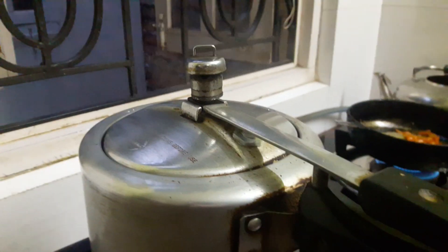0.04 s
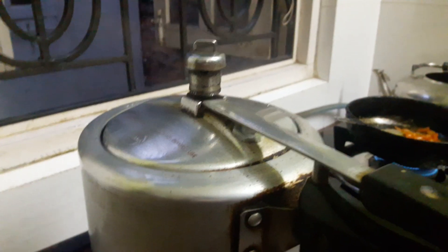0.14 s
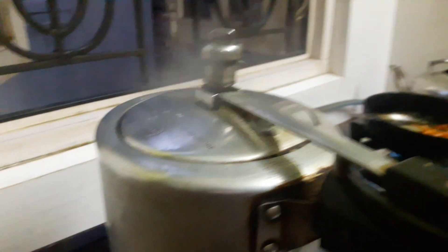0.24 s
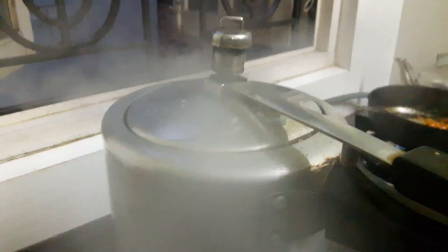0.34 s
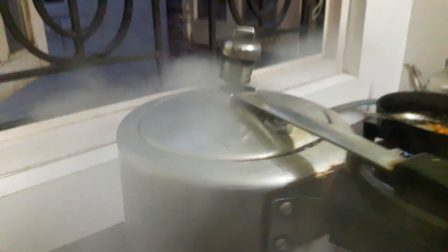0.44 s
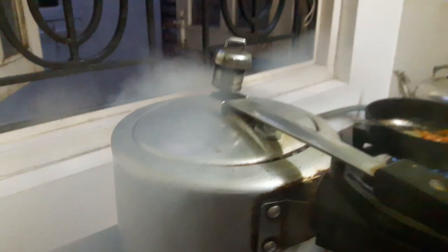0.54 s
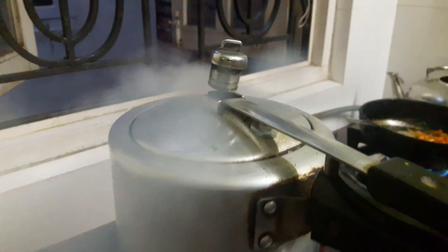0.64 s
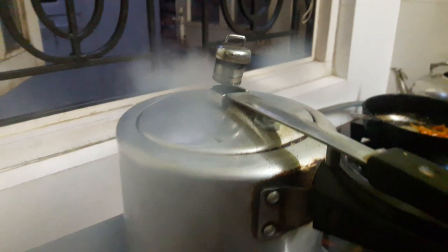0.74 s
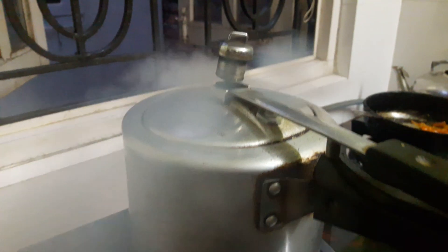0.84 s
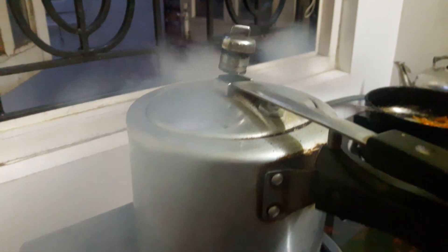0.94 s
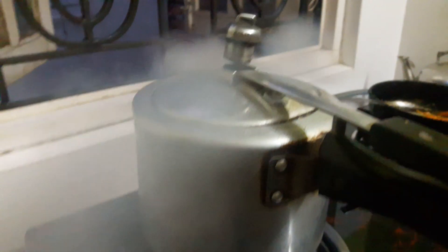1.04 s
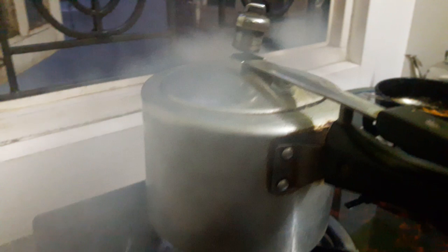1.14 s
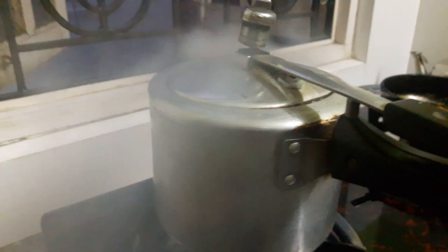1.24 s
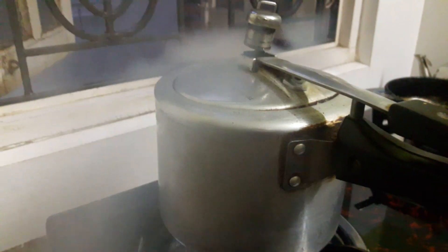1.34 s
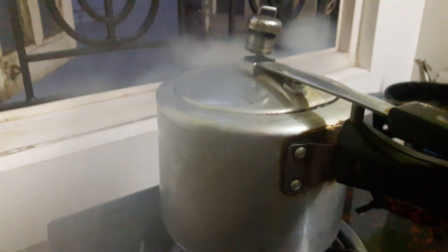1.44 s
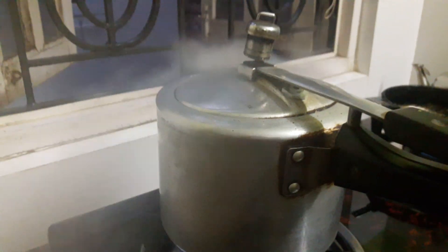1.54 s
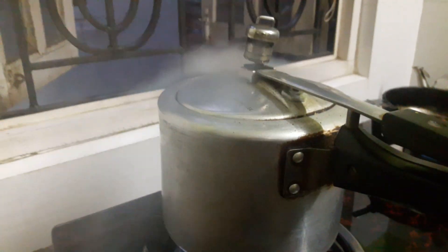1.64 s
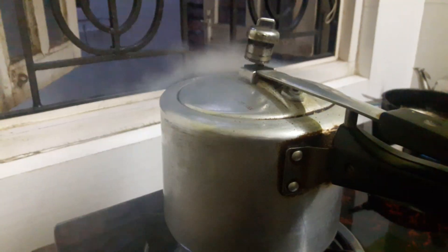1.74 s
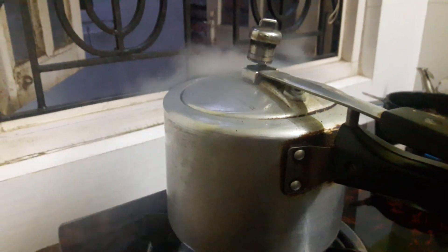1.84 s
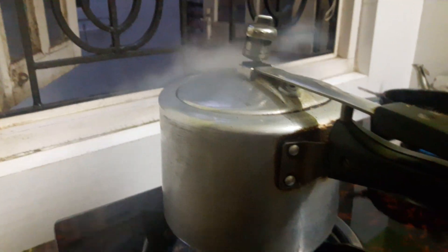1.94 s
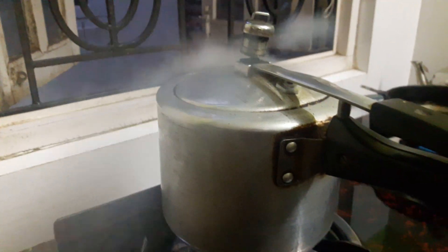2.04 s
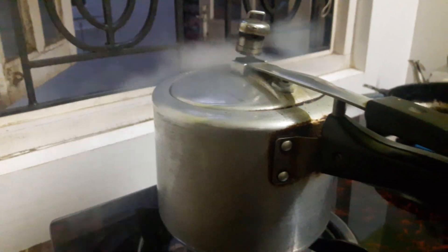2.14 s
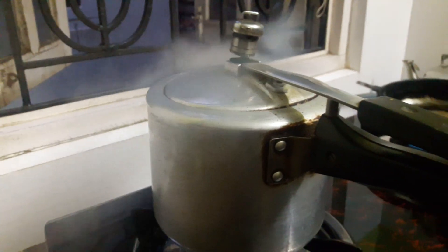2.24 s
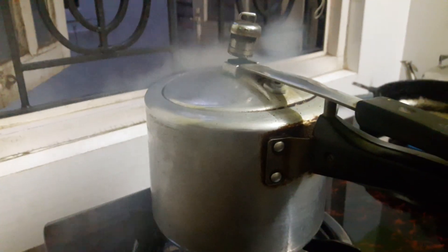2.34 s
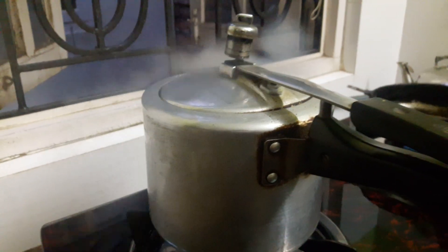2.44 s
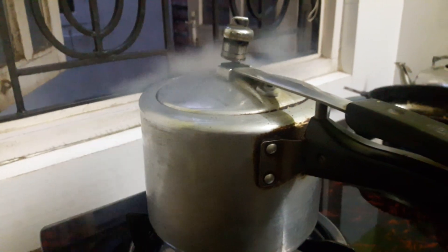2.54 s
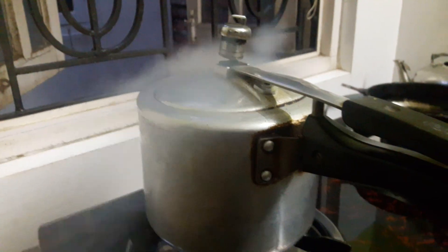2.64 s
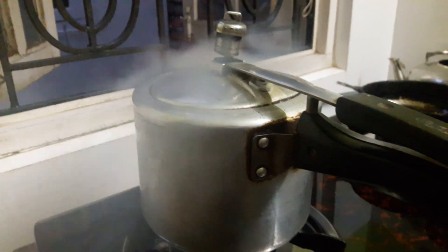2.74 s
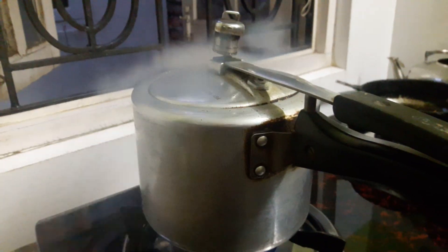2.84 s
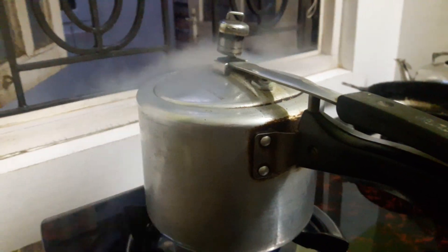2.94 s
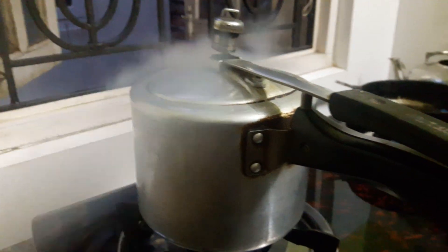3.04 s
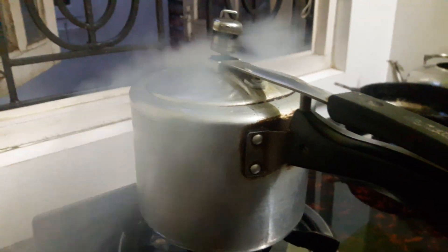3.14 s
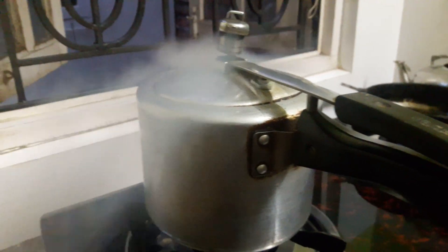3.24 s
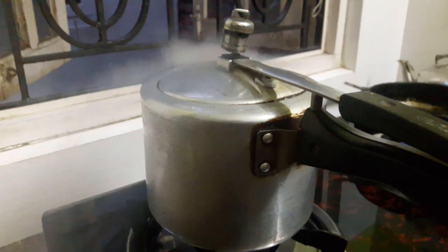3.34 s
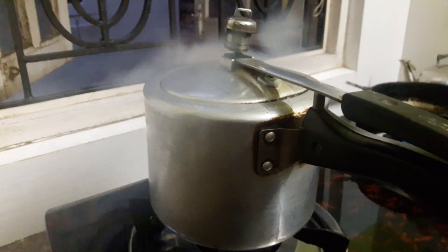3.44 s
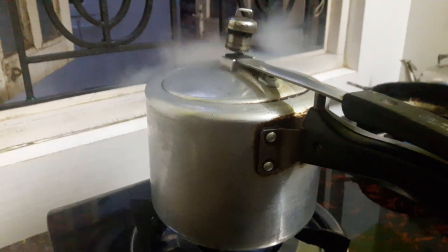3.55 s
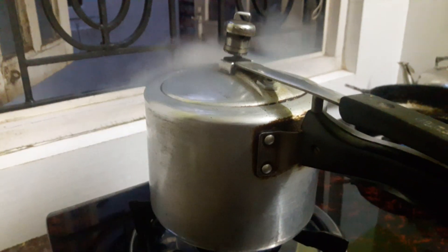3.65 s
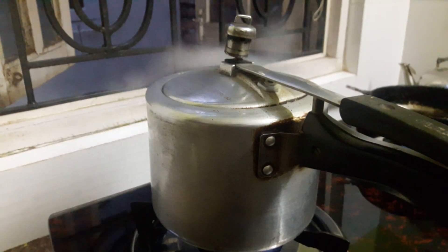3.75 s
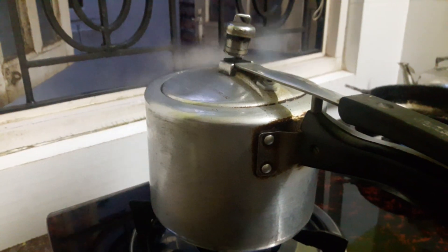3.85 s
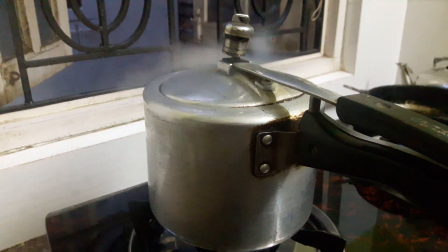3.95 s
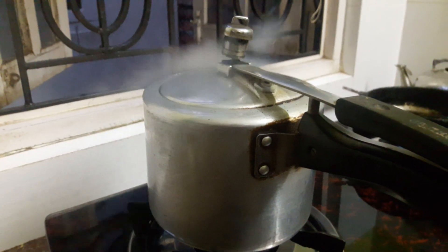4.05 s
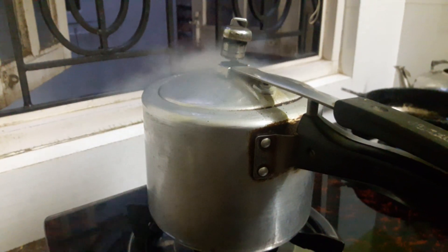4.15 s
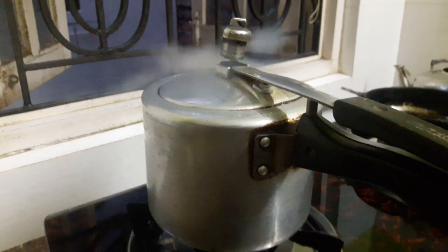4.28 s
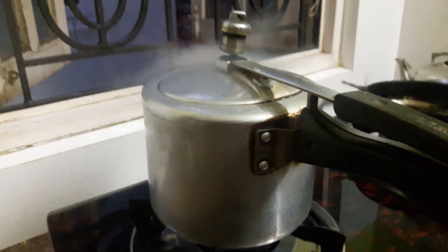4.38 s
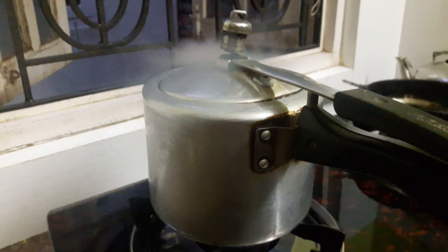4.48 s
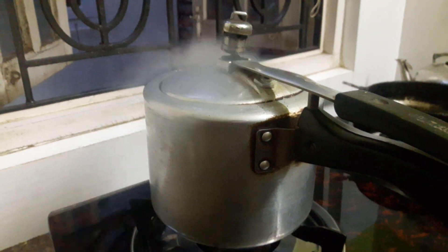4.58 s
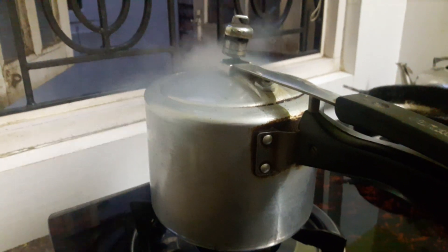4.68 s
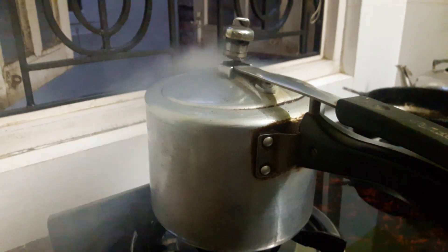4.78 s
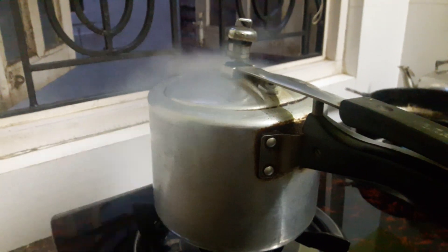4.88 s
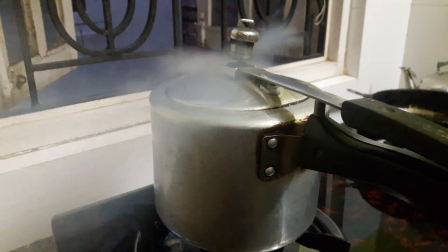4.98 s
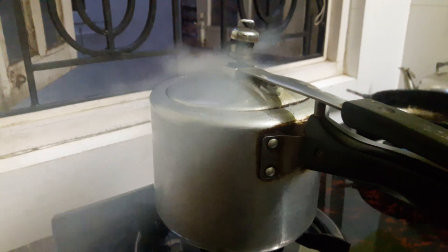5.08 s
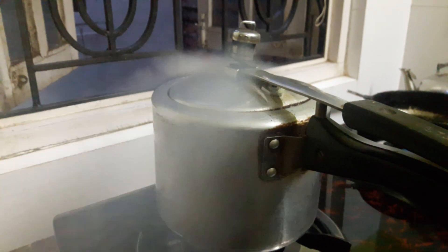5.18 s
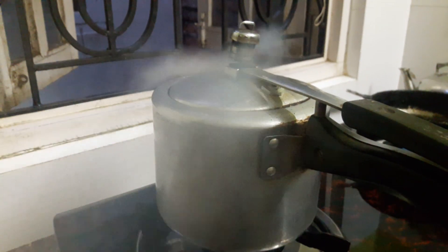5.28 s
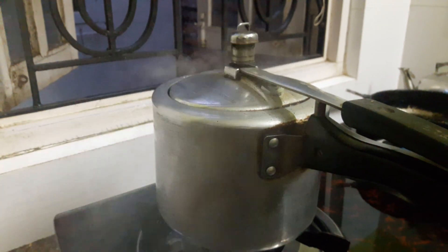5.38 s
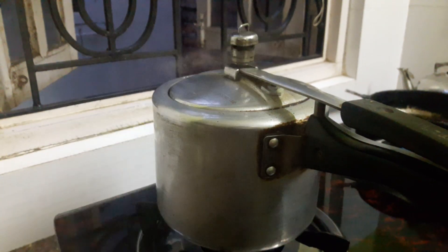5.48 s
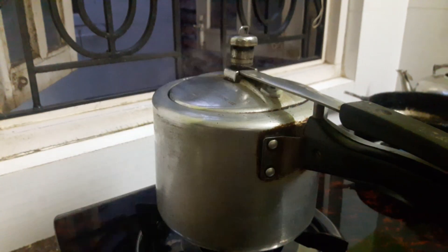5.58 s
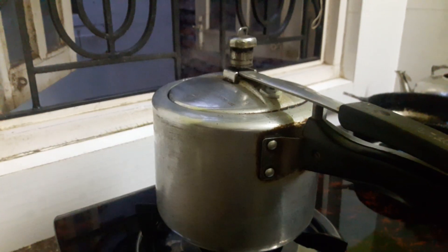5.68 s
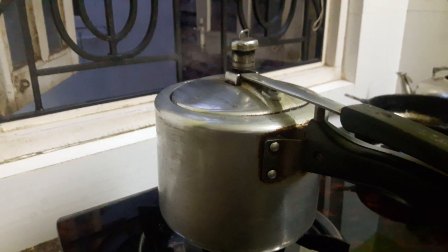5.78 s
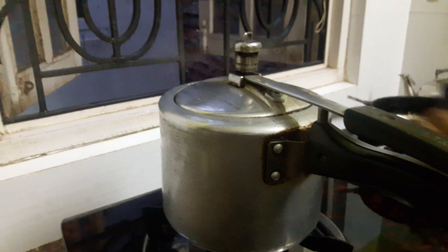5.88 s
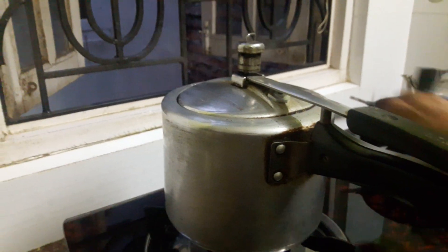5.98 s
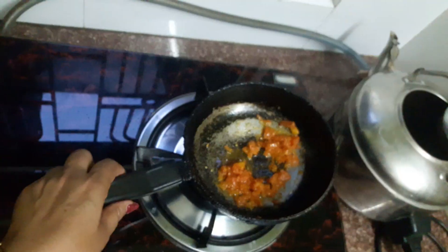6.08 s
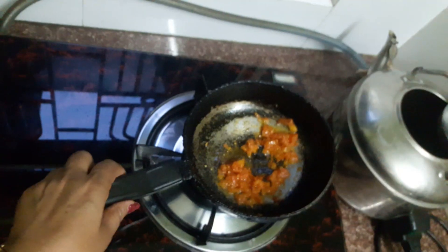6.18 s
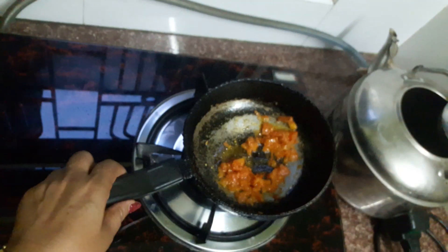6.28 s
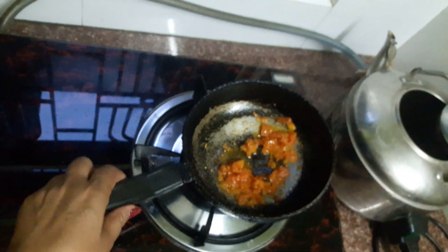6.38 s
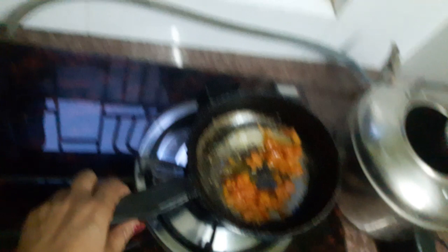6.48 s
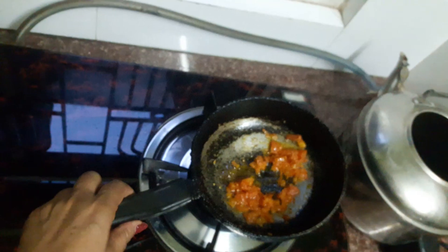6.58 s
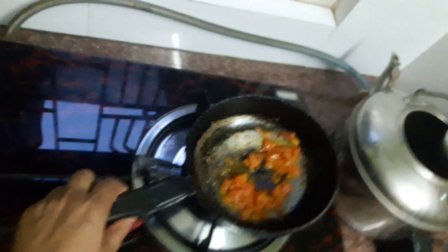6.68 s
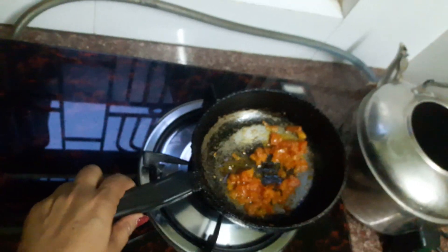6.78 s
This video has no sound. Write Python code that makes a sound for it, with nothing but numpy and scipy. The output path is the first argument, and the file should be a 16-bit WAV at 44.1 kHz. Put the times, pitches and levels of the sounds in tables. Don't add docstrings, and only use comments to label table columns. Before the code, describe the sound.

Close microphone, small hard kitchen, nearly mono. A weak uneven steam leak over flame rumble swells in under half a second into a loud, steady rush of steam with crackling distortion and an airy high whistle. After about five seconds it snaps shut, decaying quickly into near silence. Then, abruptly, a frying pan is close by, sizzling delicately with bubbles, fat spits and a few low knocks.

```python
import sys
import numpy as np
from scipy import signal
from scipy.fft import rfft, irfft
from scipy.io import wavfile
from scipy.ndimage import uniform_filter1d

SR = 44100
rng = np.random.default_rng(int(sys.argv[2]) if len(sys.argv) > 2 else 0)


def unload_audio(sound):
    columns = np.transpose(np.atleast_2d(sound))
    steps = np.round(np.clip(columns, -1, 1) * 32767)
    wavfile.write(sys.argv[1], SR, steps.astype(np.int16))


def amplitude_ratio(level_db):
    exponent = np.asarray(level_db, float) / 20
    return 10 ** exponent


N = 300762
LIFT_S, SHUT_S, PAN_S = .42, 5.455, 6.0836
GUSTS_PER_S = 7.0


def read(points, hz):
    f, value = np.transpose(points)
    return np.interp(np.log(hz + 1), np.log(f + 1), value)


def evened(x):
    return x / np.sqrt(np.mean(x ** 2) + 1e-20)


def add(mix, s, sound):
    part = mix[round(s * SR):][:len(sound)]
    part += sound[:len(part)]


def ramp(t, start, length):
    return np.clip((t - start) / length, 0, 1)


def bell(hz, centre, width):
    return np.exp(-((hz - centre) / width) ** 2)


def bumps(modes, hz):
    return sum(db * bell(hz, f, width) for f, width, db in modes)


def band_db(shape_db, hz, lo, hi):
    in_band = (hz > lo) & (hz < hi)
    return 10 * np.log10((amplitude_ratio(shape_db) ** 2 * in_band).mean(0))


def band_noise(size, lo_hz, hi_hz, skirt_hz):
    hz = np.fft.rfftfreq(size, 1 / SR)
    outside = np.maximum(np.maximum(lo_hz - hz, hz - hi_hz), 0)
    return evened(irfft(rfft(rng.standard_normal(size)) * np.exp(-(outside / skirt_hz) ** 2)))


def gusts(t, per_s):
    f = np.geomspace(per_s / 5, per_s, num=24)[:, None]
    waves = np.sin(2 * np.pi * (f * t + rng.random(f.shape))) / np.sqrt(f)
    return evened(waves.sum(0))


def ring(hz, t60, soft):
    t = np.arange(round(t60 * SR)) / SR
    return np.cos(2 * np.pi * hz * t) * amplitude_ratio(-60 * t / t60) * (1 - np.exp(-t / soft))


def grid(size):
    return np.fft.rfftfreq(size, 1 / SR)[:, None], np.arange(4 * N // size + 5) * size / 4 / SR


def hiss(shape_db, level_db, hz, lo, hi, patchy_db, flicker_db, ripple_db):
    a, b, patches, ripple = rng.standard_normal(shape_db.shape[::-1] + (4,)).T
    ripple = uniform_filter1d(ripple, size=250, axis=1)
    ripple = evened(uniform_filter1d(ripple, size=150, axis=1))
    patches = uniform_filter1d(patches, size=7, axis=0)
    patches = evened(uniform_filter1d(patches, size=16, axis=1))
    flicker = evened(uniform_filter1d(rng.standard_normal(a.shape[1]), size=4))
    gain_db = shape_db - band_db(shape_db, hz, lo, hi) + level_db
    gain_db = gain_db + patchy_db * patches + ripple_db * ripple + flicker_db * flicker
    noise = a + 1j * b
    size = 2 * len(hz) - 2
    both = np.array([noise, noise * amplitude_ratio(gain_db)])
    white, out = signal.istft(both, nperseg=size, noverlap=3 * size // 4)[1]
    return out[:N] / white.std()


# (frequency [Hz], density [dB per Hz])
FLAME_COLOUR = [(18, -50), (30, -28), (60, -9), (112, 2), (145, -3), (180, -20), (269, -13), (420, -19),
                (600, -21), (1300, -30)]
# (frequency [Hz], density [dB per Hz])
ROOM_COLOUR = [(18, -43), (30, -11.5), (59, -1), (117, 0), (362, -5), (596, -11), (1090, -9), (1270, -13),
               (4040, -12), (5390, -16), (7200, -6), (8200, -10.5), (15800, -11.5)]
# (time [s], frequency [Hz], level [dB], t60 [s])
LID_RINGS = [
    (5.452, 535, -64, .5),
    (5.47, 290, -77, .6),
    (5.655, 14200, -82, .12),
    (6.455, 535, -74, .4),
    (6.1, 280, -73, .3),
    (6.23, 270, -74, .3),
]


def kitchen():
    hz, t = grid(size=1024)
    flame_heard = (t > PAN_S) | (t < LIFT_S)
    shape_db = np.where(flame_heard, read(FLAME_COLOUR, hz), read(ROOM_COLOUR, hz))
    now = np.arange(N) / SR
    ducked_db = -93.5 + 5 * np.exp(-np.maximum(now - SHUT_S, 0) / .25)
    level_db = np.maximum(-71 - 72 * np.maximum(now - .18, 0), ducked_db)
    level_db = np.where(now > PAN_S, -75.5 + 12 * (now - PAN_S), level_db)
    out = hiss(shape_db, 0, hz, lo=50., hi=400., patchy_db=.8, flicker_db=.8, ripple_db=.6)
    out = amplitude_ratio(level_db) * out
    for at, ring_hz, db, t60 in LID_RINGS:
        add(out, at, amplitude_ratio(db) * ring(ring_hz, t60, soft=0.0072))
    return out


# (frequency [Hz], density [dB per Hz])
PAN_COLOUR = [(240, -45), (400, -5), (890, -18), (1070, -8), (1310, -16), (1600, -14), (2820, -11.5),
              (3960, -10.5), (4410, -20), (5640, -2.5), (8670, -4.5), (12900, -22.5), (15800, -14.5)]
# (frequency [Hz], width [Hz], level [dB])
PAN_MODES = [(3800, 150, 2.5), (4600, 200, 14.5), (5960, 400, -1), (3200, 400, -3)]
# (time [s], peak [dB], frequency [Hz])
SPITS = [(6.0838, -44, 7400), (6.0895, -48, 4500), (6.1274, -43, 10000), (6.1416, -42, 7200),
         (6.1506, -44, 5000), (6.2028, -46, 5700), (6.2186, -42, 4600), (6.2244, -44, 5900),
         (6.229, -47, 8600), (6.2448, -45, 14000), (6.258, -47, 5800), (6.339, -46, 6500),
         (6.3694, -45, 7000), (6.3994, -48, 14000), (6.4966, -42, 9100), (6.547, -45, 6000),
         (6.586, -47, 12000), (6.6228, -49, 4600), (6.6338, -46, 7500), (6.6455, -51, 5000),
         (6.6657, -46, 6900), (6.6808, -48, 4800), (6.689, -49, 4800), (6.7855, -47, 5200)]
# (time [s], signed peak [full scale], frequency [Hz], t60 [s])
KNOCKS = [
    (6.5628, .004, 900, .006),
    (6.5646, .007, 2200, .004),
    (6.5655, -.0045, 160, .03),
    (6.5858, .009, 1300, .003),
    (6.5853, -.039, 365, .017),
    (6.6837, .009, 335, .02),
    (6.6855, -.0032, 105, .05),
    (6.7525, .002, 280, .015),
    (6.758, -.0026, 380, .015),
    (.31, .002, 80, .046),
]


def pan():
    hz, t = grid(size=256)
    level_db = -58.6 - 1.0 * np.maximum(t - PAN_S, 0)
    fizz_db = 1.5 + 33 * np.maximum(t - 6.47, 0)
    shape_db = read(PAN_COLOUR, hz) + bumps(PAN_MODES, hz) + fizz_db * read([(8500, 0), (12500, 1)], hz)
    out = hiss(shape_db, level_db, hz, lo=4000., hi=10000., patchy_db=1.3, flicker_db=1.0, ripple_db=1.2)
    for pop_hz in np.geomspace(4200, 15000, num=12):
        sizes = amplitude_ratio(3.2 * np.minimum(rng.exponential(size=N), 4))
        pops = sizes * (rng.random(N) < 25 / SR)
        out += amplitude_ratio(-66.5) * signal.oaconvolve(pops, ring(pop_hz, .004, soft=.0001))[:N]
    for at, db, spit_hz in SPITS:
        fade = amplitude_ratio(-60 * np.arange(3000) / SR * spit_hz / 150)
        spray = band_noise(3000, .85 * spit_hz, 1.15 * spit_hz, skirt_hz=600)
        add(out, at, amplitude_ratio(db - 9.5) * fade * spray)
        add(out, at, amplitude_ratio(db + 3.5) * ring(spit_hz, 0.0027, soft=.00003))
    out = signal.sosfilt(signal.butter(4, 250, "high", fs=SR, output="sos"), out)
    out[:round(PAN_S * SR)] = 0
    for at, peak, knock_hz, t60 in KNOCKS:
        add(out, at, peak * ring(knock_hz, t60, soft=0.000068))
    return out


# (time [s], level [dB])
LULLS = [(1.4, 2.5), (1.85, 1), (2.2, -3.5), (2.58, -4.5), (2.79, 0.5), (2.9, -0.5), (3.3, 1), (3.47, 2),
         (3.68, -4), (3.98, 0.5), (4.28, -1.5), (4.68, -1.5)]


def lulls(t):
    return sum(db * np.exp(-((t - at) / .055) ** 2) for at, db in LULLS)


# (frequency [Hz], density [dB per Hz])
CLICK_COLOUR = [(15, -76), (30, -36), (60, -14.5), (104, -3.5), (150, -1.5), (303, 0.5), (942, -2.5),
                (2500, -9.5), (5000, -18), (9000, -44), (20000, -75.5)]


def click_shape():
    log_gain = np.log(amplitude_ratio(read(CLICK_COLOUR, abs(np.fft.fftfreq(8192, 1 / SR)))))
    return np.fft.ifft(np.exp(log_gain - 1j * signal.hilbert(log_gain).imag)).real[:4096]


# (time [s], signed peak [full scale])
BIG_SLIPS = [(.4025, -.05), (.4345, .013), (.441, -.027), (.444, .037), (.4468, -.032), (.454, -.016),
             (.456, .03), (.4617, .078), (.4652, -.048), (.4725, -.05), (5.4125, .035), (5.4213, -.034),
             (5.4335, .013), (5.441, -.048)]


def crackle():
    start_s, end_s, surge_s = .48, 5.414, 0.083
    t, coarse = np.arange(N) / SR, np.arange(0, N / SR, .005)
    jet_s, _, jet_whistle = np.transpose(JET)
    whistle = np.interp(coarse, jet_s, jet_whistle)
    level_db = -37 + 3 * np.exp(-abs(coarse - start_s) / surge_s) + 0.5 * gusts(coarse, GUSTS_PER_S)
    level_db += .35 * lulls(coarse)
    bright_db = 2 - 7 * (np.clip(whistle, 0, 1) ** 4 + 1 - ramp(coarse, start_s, surge_s))
    bright_db += 0.93 * gusts(coarse, GUSTS_PER_S) + lulls(coarse)
    opening, closing = (t - start_s) / .15 + .1, (end_s - t) / .04 + .2
    per_s = 7000 * np.clip(np.minimum(opening, closing), 0, 1)
    slips = rng.uniform(-1, 1, N) * (rng.random(N) < per_s / SR) / np.sqrt(per_s + 1400)
    slips *= amplitude_ratio(.7 * evened(uniform_filter1d(rng.standard_normal(N), size=400)))
    click = click_shape()
    dense = evened(signal.oaconvolve(slips, click)[:N])
    dull = signal.oaconvolve(dense, signal.firwin(101, 1300, fs=SR), "same")
    dense = dull + (dense - dull) * amplitude_ratio(np.interp(t, coarse, bright_db))
    bass = signal.lfilter(*signal.butter(2, 220, fs=SR), dense)
    rumble_db = 2.5 * (np.interp(t, coarse, whistle) - 0.15)
    dense += bass * (amplitude_ratio(rumble_db) - 1)
    dense *= amplitude_ratio(np.interp(t, coarse, level_db))
    for at, peak in BIG_SLIPS:
        add(dense, at - .0003, .7 * peak * click / click.max())
        add(dense, at - .0004, .55 * peak * ring(125, .022, soft=.0003))
    return dense


# (time [s], level [dB], whistle [0-1, flow locked onto the nozzle's ring])
JET = [(0, -49, 0.4), (.06, -57, .5), (.14, -50.5, 0.4), (.21, -49.5, 0), (.35, -43, 0.84), (.41, -38.5, 0),
       (.46, -44.5, 0.23), (.58, -43, 0.13), (1.15, -43.5, 0.25), (1.35, -43.5, 0.48), (2.6, -44.5, 0.66),
       (3.0, -45.5, 0.8), (3.4, -44.5, 0.89), (3.68, -45, 0.52), (3.85, -43, 0.2), (5.3, -43.5, 0.4),
       (5.42, -47.5, 0.8), (5.455, -57, 0.8)]
# (frequency [Hz], density [dB per Hz])
LEAK_COLOUR = [(150, -27), (400, -19.5), (1000, -12), (2000, -8.5), (3700, -3.5), (4700, -5), (6450, 0.5),
               (7400, 3), (8140, -6), (11200, -4), (13000, -7.5), (15800, -9)]
# (frequency [Hz], density [dB per Hz])
VENT_COLOUR = [(150, -28.5), (600, -17), (2000, -13), (5040, -13), (5450, -14), (5800, -12), (6450, -7.5),
               (7470, -8.5), (8080, -13.5), (8980, -12.5), (10500, -13.5), (11800, -10.5), (13500, -14.5),
               (15800, -14)]
# (frequency [Hz], t60 [s])
RINGOUT = [(300, .5), (1500, .46), (4000, .42), (7000, .38), (15000, .32)]


def jet():
    hz, t = grid(size=512)
    jet_s, jet_db, jet_whistle = np.transpose(JET)
    level_db, whistle = np.interp(t, jet_s, jet_db), np.interp(t, jet_s, jet_whistle)
    turn_s = 2.95
    lifted, turned = ramp(t, LIFT_S, 0.37), ramp(t, turn_s, 0.26)
    shape_db = (1 - lifted) * read(LEAK_COLOUR, hz) + lifted * read(VENT_COLOUR, hz)
    shape_db += 1.5 * (turned - .5) * lifted * bell(hz, 13300, 1300)
    ring_tilt = read([(5000, 0.28), (5700, -1), (7500, 1), (8000, 0.079)], hz)
    shape_db += 4.5 * (ramp(t, turn_s, 1.9) - .5) * lifted * ring_tilt
    shape_db += 3 * whistle * lifted * bell(hz, 6410, 170)

    gust_db = [0.45 * lifted * gusts(t, GUSTS_PER_S) for part in range(4)]
    body = -3.5 + lifted * (0.5 + 0.2 * whistle) - 0.96 * turned + gust_db[0]
    body += .4 * lulls(t)
    nozzle = -0.5 + 7 * whistle + gust_db[1]
    air = -0.1 + 5 * whistle * (1 - lifted + turned) + 0.8 * turned + gust_db[2]
    air += 3.5 * ramp(t, SHUT_S - .08, .06)

    def over_db(lo, hi):
        return band_db(shape_db, hz, lo, hi) - band_db(shape_db, hz, 8500, 11000)

    body_band = read([(1200, 0), (2800, 1), (4900, 1), (5500, 0)], hz)
    nozzle_band = read([(4900, 0), (5500, 1), (7800, 1), (8400, 0)], hz)
    air_band = read([(10600, 0), (11600, 1)], hz)
    shift_db = (body - over_db(3000, 5000)) * body_band
    shift_db += (nozzle - over_db(5500, 7800)) * nozzle_band
    shift_db += (air - over_db(11000, 15500)) * air_band
    shift_db += -6.0 * (t < .285) * (bell(hz, 4500, 350) + 0.14 * (hz < 8000))
    thin_band = read([(500, 0), (900, 0.93), (2200, 0.92), (3200, 0.038)], hz)
    shift_db += -1 * (1 - ramp(t, 0.51, .04)) * thin_band
    decay_db = -60 * np.maximum(t - SHUT_S, 0) / read(RINGOUT, hz)
    level_db = level_db + .5 * gust_db[3] + decay_db
    return hiss(shape_db + shift_db, level_db, hz, lo=8010.0, hi=11040.0,
                patchy_db=1.3, flicker_db=-0.17, ripple_db=2.0)


def scene():
    return np.tile(jet() + crackle() + kitchen() + pan(), (2, 1))


# (frequency [Hz], width [Hz], level [dB])
MIC_PORT = [(5480, 40, 4), (6300, 200, 0), (7500, 230, 1.5), (7990, 150, -9), (8430, 91, 1)]


def microphone(dry):
    hz = np.fft.rfftfreq(N, 1 / SR)
    x = irfft(rfft(dry) * amplitude_ratio(bumps(MIC_PORT, hz)), N)
    x = .14 * np.tanh(x / .14)
    return irfft(rfft(x) * np.clip((15760 - hz) / 60, 0, 1), N)


STARVED_FRAMES = (21, 26, 55, 59, 93, 122, 126, 129, 143, 152, 153, 232)


def starve(x):
    n, k = np.arange(2048) + .5, np.arange(1024)[:, None] + .5
    basis = np.cos(np.pi / 1024 * (n + 512) * k) * np.sin(np.pi * n / 2048) / np.sqrt(512)
    starts = 603 + 1024 * (np.array(STARVED_FRAMES) - 1)
    lines = x[0][starts[:, None] + np.arange(2048)] @ basis.T
    step_db = [(300, -17), (3000, -19.5), (6000, -21.5), (9000, -23.5), (14000, -24)]
    step = amplitude_ratio(read(step_db, k.T * SR / 2048))
    step = step * amplitude_ratio(1.2 * np.isin(STARVED_FRAMES, (152, 153)))[:, None]
    kept = step * np.sign(lines) * np.floor(abs(lines) / step + 0.43)
    lost = (lines - kept) @ basis
    for start, part in zip(starts, lost):
        x[:, start:start + len(part)] -= part
    return x


# (time [s], upper edge [Hz])
APART_BASS = [(1.066, 3800), (2.053, 3400), (3.825, 1200), (3.973, 3360), (4.289, 4600), (4.82, 2850),
              (4.955, 3160), (5.05, 1520), (5.145, 2290)]
# (time [s], centre [Hz])
APART_TREBLE = [(.812, 13100), (.812, 15030), (.904, 9650), (.995, 5160), (.995, 9650), (1.207, 4630),
                (1.336, 15130), (1.743, 4930), (1.953, 12350), (4.112, 4860), (4.69, 4920), (4.69, 8970),
                (4.69, 11640), (4.83, 4580), (4.83, 12400), (5.178, 9620), (5.368, 7360)]


def apart():
    side = np.zeros(N)
    bursts = [(at, 120, top_hz, -61.5) for at, top_hz in APART_BASS]
    bursts += [(at, f - 660, f + 660, -49.5) for at, f in APART_TREBLE]
    for at, lo_hz, hi_hz, db in bursts:
        noise = band_noise(2048, lo_hz, hi_hz, skirt_hz=20)
        add(side, at - 1024 / SR, amplitude_ratio(db) * np.hanning(2048) ** .6 * noise)
    return side * np.array([[1], [-1]])


def low_pass(x):
    return signal.sosfilt(signal.butter(12, 16910, fs=SR, output="sos"), x)


def record(dry):
    x = starve(microphone(dry))
    x += apart()
    return low_pass(x)


dry = scene()
out = record(dry)
unload_audio(out)
```